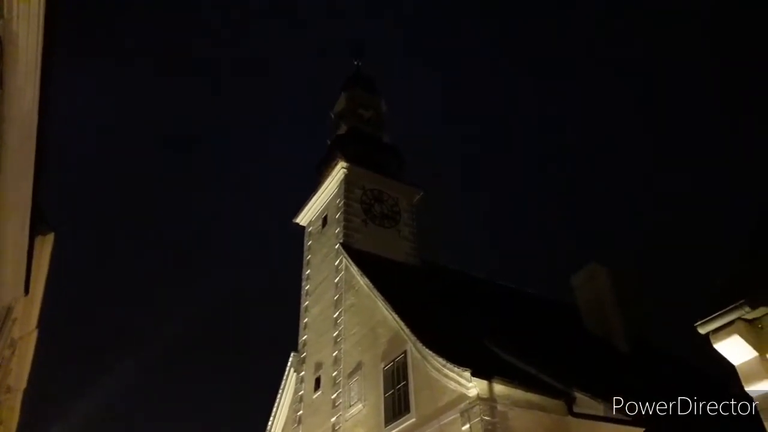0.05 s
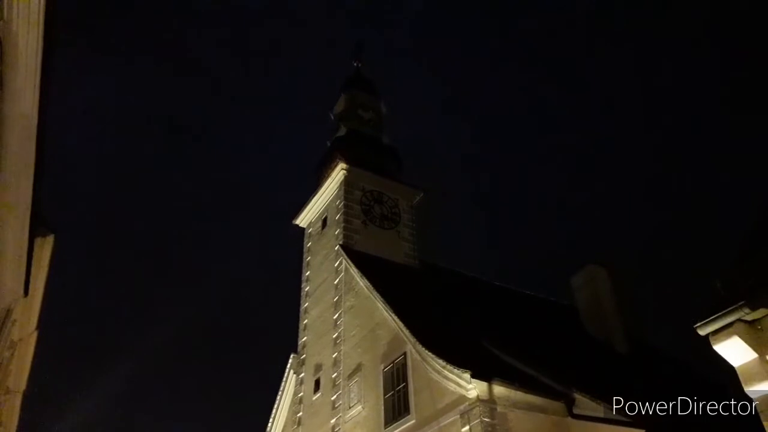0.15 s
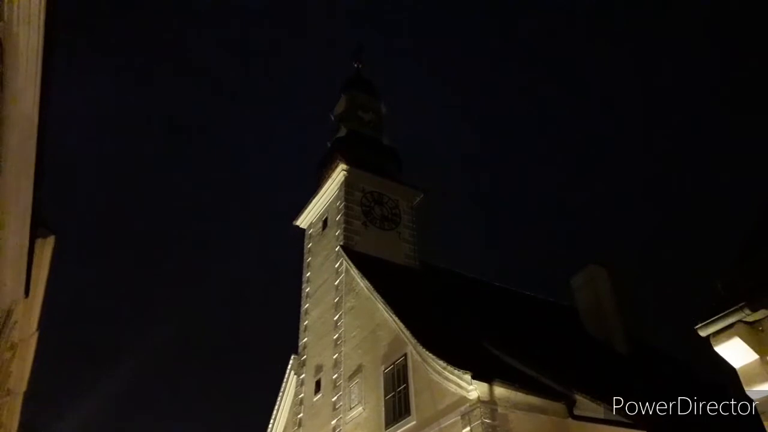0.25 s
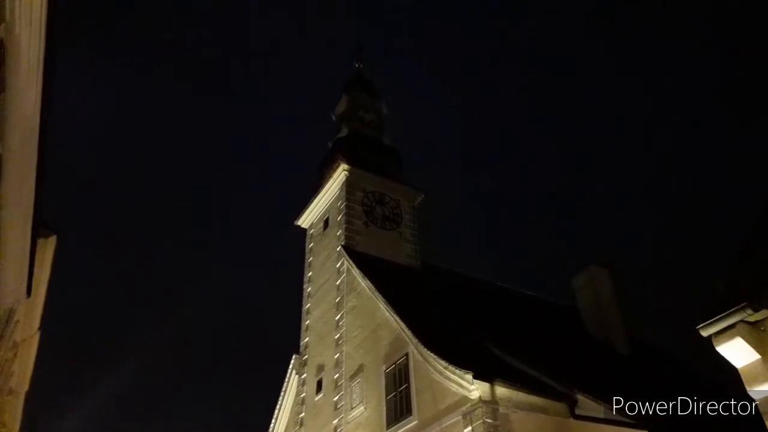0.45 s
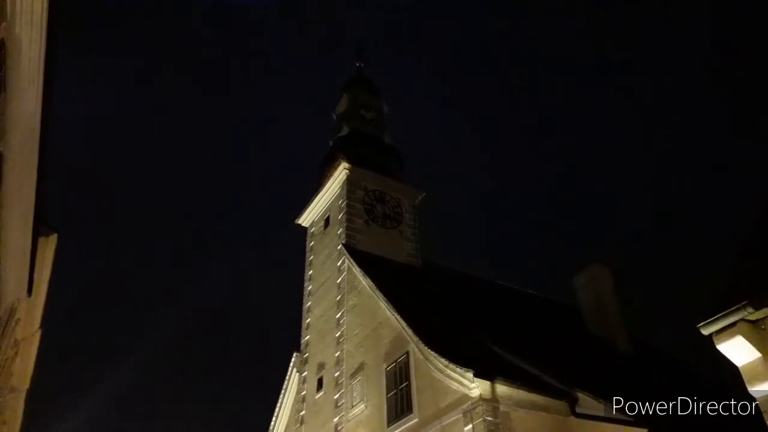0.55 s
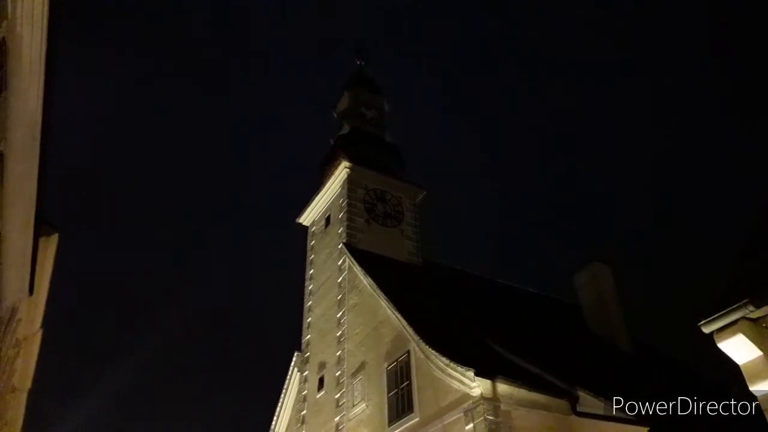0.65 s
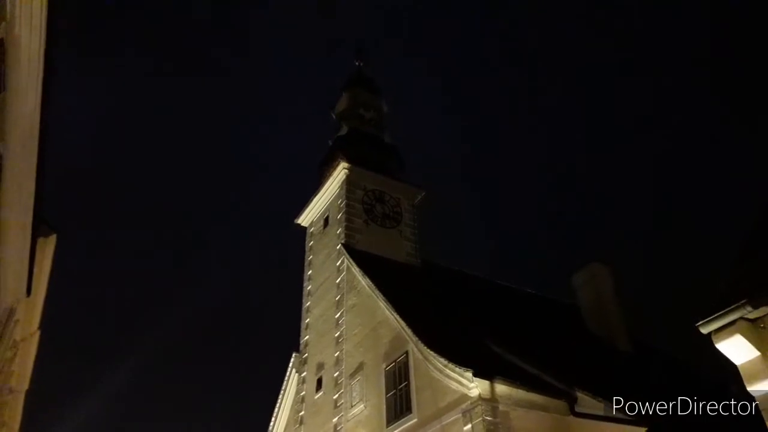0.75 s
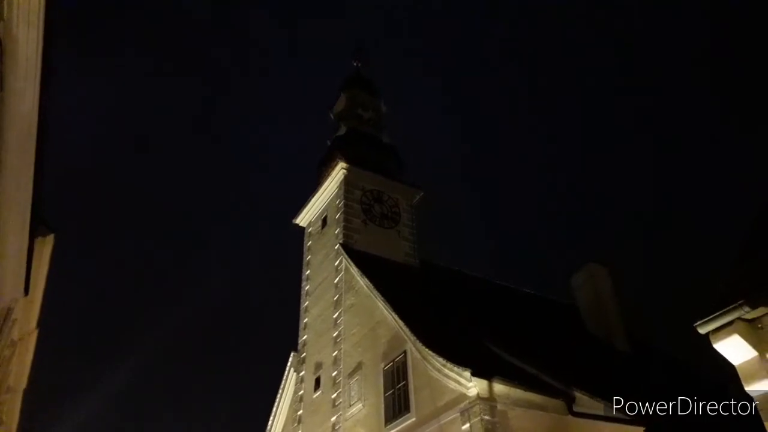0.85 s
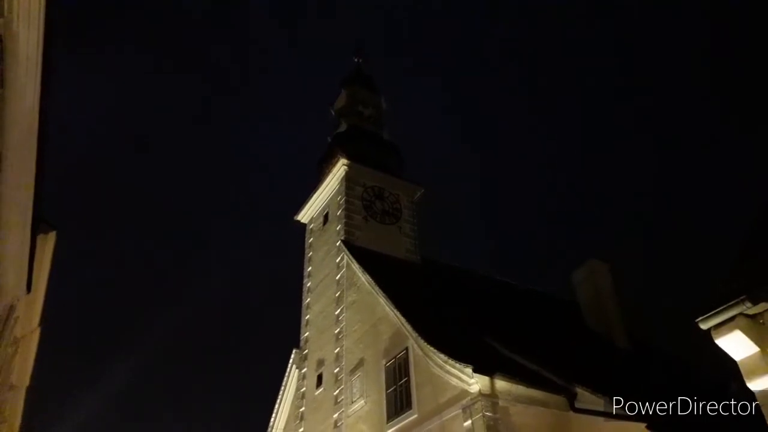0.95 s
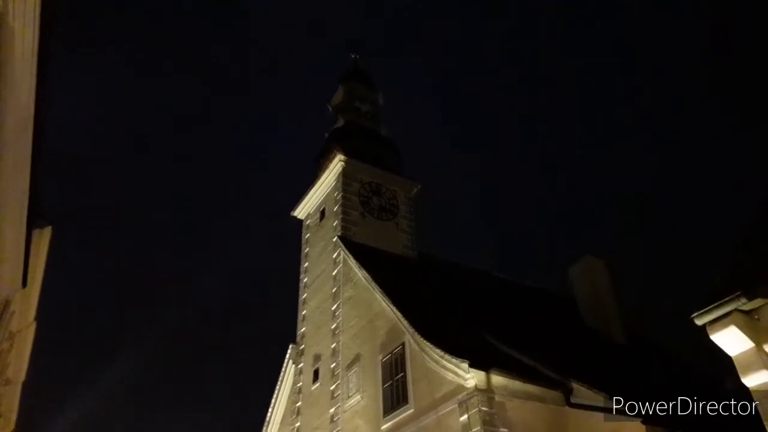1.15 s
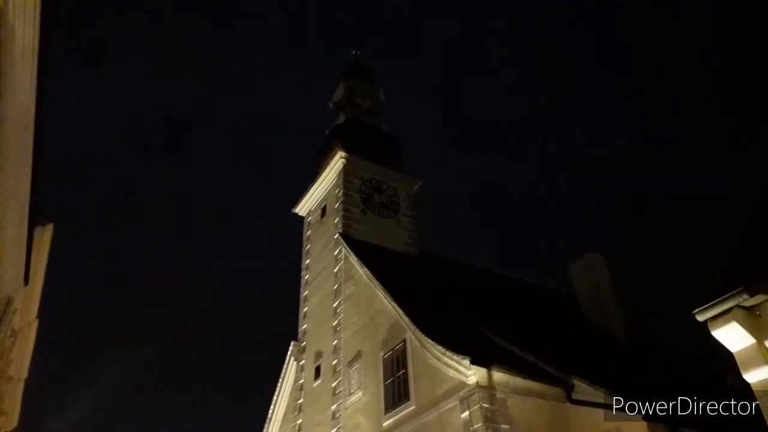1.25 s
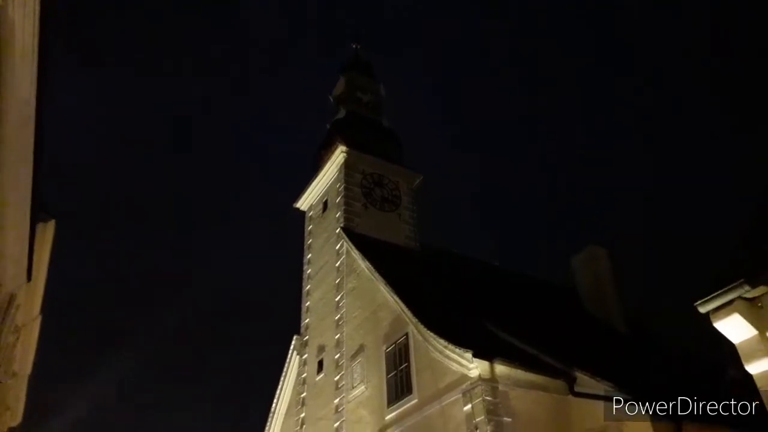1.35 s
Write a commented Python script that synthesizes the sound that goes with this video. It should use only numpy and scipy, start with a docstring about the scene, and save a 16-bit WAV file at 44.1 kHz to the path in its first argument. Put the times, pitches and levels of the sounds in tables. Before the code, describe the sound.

A tower clock bell strikes once, ringing out and fading over a quiet town.

```python
"""A quiet town at night, where a tower clock strikes its bell once.
The hammer's impact gives a bright clang and excites the bell's normal modes, which beat in close pairs.
Reflections from tower and house walls prolong the sound. The loud start overloads the microphone
a little; the lowest partials decay most slowly and ring on over the hush of the streets."""
import sys
import numpy as np
from scipy import signal
from scipy.fft import rfft, irfft, next_fast_len
from scipy.io import wavfile

SR = 44100
rng = np.random.default_rng(int(sys.argv[2]) if len(sys.argv) > 2 else 0)


def inscribe(sig):
    """Save sig as 16-bit PCM at rate SR to the path in sys.argv[1].

    A 1-D sig is mono; a 2-D sig holds one channel per row.
    Samples are clipped to [-1, 1] before scaling.
    """
    pcm = np.round(np.clip(np.atleast_2d(sig).T, -1, 1) * 32767)
    wavfile.write(sys.argv[1], SR, pcm.astype(np.int16))


N = 61739
STRIKE_S = 0.2125  # clock counts from the start of the scene, t from this blow


# Main mode pairs of the bell: f/Hz, level/dB, T60/s, beat rate/Hz, amplitude ratio of the twin
BELL_MODES = [(714.8, -28, 2.53, 0.99, 0.41), (1296, -19, 2.05, 5.6, 0.06), (1990.6, -18, 1.37, 2.48, 0.38),
              (2023, -19.5, 0.54, 2, 0.55), (2180, -41, 1.8, 1.9, 0.5), (2345, -25, 1.03, 2.06, 0.7),
              (2428, -21.5, 1.13, 9.06, 0.73), (2803, -14, 0.93, 1.35, 0.39),
              (2971.5, -13.5, 0.91, 2.97, .44), (3497, -16.5, 1.214, 0.83, 0.65),
              (3673, -23.5, 1.12, 1.4, .28), (4050, -32, 0.65, 1.6, 0.6), (4026, -21.5, 1.17, 6.93, 0.55),
              (4123, -8, 1.164, 1.14, 0.34), (4410, -11.5, 0.75, 8.6, 0.65), (4660, -20.5, 0.67, 3.3, 1),
              (4876, -8, 0.82, 6.8, 0.41), (5320, -23, 0.93, 7.1, 0.1), (5778, -10.5, 0.81, 2.82, 0.3),
              (5880, -25, 0.75, 10.9, .27), (6130, -36, 1.16, 1.5, .31), (6676, -27.5, 0.78, 4, .3),
              (6792, -14.5, 0.65, 3.44, 0.41), (6820, -28.5, 1, 1.4, 0.36), (6985, -30.5, 1, 1.4, 0.8),
              (7737, -30, 0.7, 9.7, 0.1), (7776, -25, 0.53, 9.9, 0.9), (7890, -18, 0.68, 2.4, 0.46)]
# Faint highest modes: f/Hz, level/dB
HIGH_MODES = [(8377, -48), (9114, -32), (9282, -37.5), (10288, -36.5), (10371, -29), (10566, -30.5),
              (11615, -40), (11702, -29.5), (11881, -49), (13061, -31), (13239, -45), (13880, -45),
              (14450, -49), (14658, -49), (15430, -47)]

def bell(t):
    """Superposition: the struck bell vibrates as a sum of damped normal modes."""
    main = sum(partial(t, *mode) for mode in BELL_MODES)
    high = sum(partial(t, hz, db, t60=0.69, beat_hz=6.45 * (0.5 + rng.random()), twin=0.4)
               for hz, db in HIGH_MODES)
    return main + high


def partial(t, hz, db, t60, beat_hz, twin):
    """Beating: two close modes interfere, while wall reflections build up and make the tone waver."""
    direct_share, bloom_s, full_scatter_hz = 0.22, 0.063, 2520
    bloom = 1 - np.exp(-t / bloom_s)
    beating = 1 + twin * np.exp(2j * np.pi * beat_hz * t)
    pair = beating * (direct_share + (1 - direct_share) * bloom)
    depth = 0.27 * min(hz / full_scatter_hz, 1)  # low partials waver less
    scatter = depth * bloom * decay(t, t60=4.8) * waver(width_hz=30)
    carrier = np.exp(2j * np.pi * (hz * t + rng.random()))
    return amp(db) * decay(t, t60) * ((pair + scatter) * carrier).real


def low_ring(t):
    """Narrow-band noise: a faint, low ring wavers as it decays under the partials."""
    ring_hz = 269
    ring = (waver(width_hz=10.7) * np.exp(2j * np.pi * ring_hz * t)).real
    return amp(-44.5) * decay(t, t60=3.1) * ring


# Envelope of a tight mode cluster: t/s from the start of the scene, relative level/dB
CLUSTER_ENVELOPE = [(0.215, -29), (0.257, -15), (0.287, -20), (0.317, -17.5), (0.343, -17.5), (0.367, -37),
                    (0.423, -21.5), (0.491, -37.5), (0.569, -32.5), (0.587, -41), (0.643, -38),
                    (0.849, -55), (0.911, -42), (0.957, -64), (1.0, -53)]

def mode_cluster(t):
    """Interference: closely spaced modes make one rough tone that swells and sinks unevenly."""
    centre_hz = 2395
    times, db = np.transpose(CLUSTER_ENVELOPE)
    clock = t + STRIKE_S
    tail = decay(np.maximum(clock - times[-1], 0), t60=1.99)
    envelope = amp(np.interp(clock, times, db) - 0.5) * tail
    tone = (1 + waver(width_hz=32)) * np.exp(2j * np.pi * centre_hz * t)
    return envelope * unit(tone.real)


# Spectrum of the bell's dense small modes: f/Hz, relative spectral level/dB
CLANG_SPECTRUM = [(50, -53), (120, -4), (175, -3.5), (240, -11), (500, -11.5), (1000, -12), (1700, -13.5),
                  (2100, 0.5), (2500, -1), (3200, -5), (4200, -7.5), (5000, -3.5), (6300, -12.5),
                  (7900, -9.5), (8500, -24), (13000, -30), (15400, -36), (16000, -52)]
# Their decay times: f/Hz, T60/s
CLANG_DECAY = [(130, 0.83), (500, 1), (1200, 1), (2400, 1), (5000, 1), (12000, 1)]

def clang(t):
    """Reverberation: dense modes merge into a metallic wash that builds up and dies between the walls."""
    rise_s = 0.0057
    hz, times, bands = signal.stft(noise(CLANG_SPECTRUM), SR, nperseg=512)
    damping = decay(np.maximum(times - STRIKE_S, 0), at_frequency(CLANG_DECAY, hz)[:, None])
    wash = signal.istft(bands * damping, SR, nperseg=512)[1][:N]
    return amp(-22) * (1 - np.exp(-t / rise_s)) * wash


def shimmer(t):
    """Free vibration: 140 weak modes at random frequencies ring with the colour of the clang."""
    low_hz, high_hz, spread_db = 1930.5, 15330, 16
    pitch, strength, phases = rng.random(size=(140, 3)).T
    hz = low_hz * (high_hz / low_hz) ** pitch
    db = at_frequency(CLANG_SPECTRUM, hz) + spread_db * (2 * strength - 1)
    gains = amp(db) * np.sqrt(hz)  # offsets the wider spacing of high modes
    modes = sum(gain * np.sin(2 * np.pi * (f * t + phase)) for f, gain, phase in zip(hz, gains, phases))
    rms = np.sqrt(np.sum(gains ** 2) / 2)
    return amp(-18.5) * decay(t, t60=0.79) * modes / rms


# Spectrum of the hammer's impact: f/Hz, relative spectral level/dB
CRACK_SPECTRUM = [(100, -37), (400, -10), (1500, -12.5), (2100, 7.5), (3200, -9.5), (4700, 1.5),
                  (6500, -19), (8000, -23), (8700, -32), (15000, -26), (16000, -53)]

def hammer_crack(t):
    """Impulsive excitation: a brief blow spreads its energy over a wide band."""
    return amp(-9) * decay(t, t60=0.064) * noise(CRACK_SPECTRUM)


def hammer_touch(clock):
    """Contact transient: the hammer's light first touch gives a bright tick just ahead of the blow."""
    onset_s, width_s, band_hz = 0.2028, 0.012, (3430, 7700)
    bandpass = signal.butter(2, band_hz, "band", fs=SR, output="sos")
    tick = unit(signal.sosfilt(bandpass, rng.standard_normal(N)))
    age = (clock - onset_s) / width_s
    return amp(-28.5) * tick * (age > 0) * np.exp(-age ** 2 / 2)


# Spectrum of the distant streets: f/Hz, relative spectral level/dB
HUSH_SPECTRUM = [(25, -3), (60, -0.5), (140, -2.5), (270, -3), (400, -4.5), (700, -2.5), (1200, -7),
                 (2500, -6), (5000, -13.5), (7800, -16), (8800, -29.5), (15000, -35), (16000, -63)]

def town_hush(clock):
    """Ambient noise: the broadband hush of the town, a little lower from the stroke on."""
    return noise(HUSH_SPECTRUM) * amp(np.where(clock < STRIKE_S, -45, -49.5))


def noise(spectrum):
    """Spectral shaping: white noise takes the given colour, at rms 1."""
    gain = amp(at_frequency(spectrum, np.fft.rfftfreq(N, 1 / SR)))
    return unit(irfft(rfft(rng.standard_normal(N)) * gain, N))


def waver(width_hz):
    """Random modulation: low-passed complex noise drifts in amplitude and phase, at rms 1."""
    size = next_fast_len(N)
    white = rng.standard_normal(size) + 1j * rng.standard_normal(size)
    hz = np.fft.fftfreq(size, 1 / SR)
    return unit(np.fft.ifft(white / (1 + (hz / width_hz) ** 2))[:N])


def decay(t, t60):
    """Exponential damping: the level falls 60 dB in t60 seconds."""
    return np.exp(-np.log(1000) * t / t60)


def at_frequency(table, hz):
    """Interpolation on a logarithmic frequency axis."""
    f, value = np.transpose(table)
    return np.interp(np.log(hz + 1), np.log(f + 1), value)


def amp(db):
    """Amplitude ratio of a level in decibels."""
    return 10 ** (np.asarray(db) / 20)


def unit(x):
    """Normalisation to rms 1."""
    return x / np.sqrt(np.mean(abs(x) ** 2) + 1e-20)


def scene():
    """Superposition: the pressures of one bell stroke and the town's hush add in one channel."""
    attack_s = 0.00028
    clock = np.arange(N) / SR
    t = np.maximum(clock - STRIKE_S, 0)
    stroke = bell(t) + low_ring(t) + mode_cluster(t) + clang(t) + shimmer(t) + hammer_crack(t)
    onset = np.minimum(t / attack_s, 1)
    return (onset * stroke + hammer_touch(clock) + town_hush(clock))[None]


def record(dry):
    """Saturation and band limiting: the microphone rounds the loudest peaks, then cuts both band edges."""
    ceiling, low_cut_hz, high_cut_hz = 1.05, 98, 15900
    saturated = dry / (1 + (dry / ceiling) ** 6) ** (1 / 6)
    highpass = signal.butter(2, low_cut_hz, "high", fs=SR, output="sos")
    lowpass = signal.firwin(511, high_cut_hz, window=("kaiser", 9), fs=SR)
    return signal.oaconvolve(signal.sosfilt(highpass, saturated), lowpass[None], "same")


dry = scene()
out = record(dry)
inscribe(out)
```